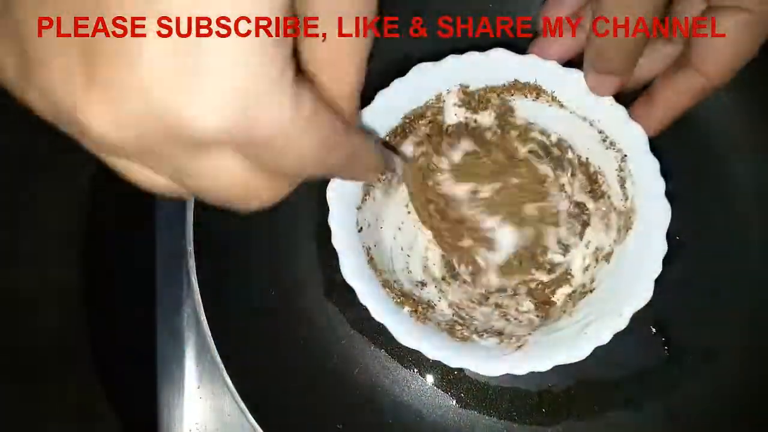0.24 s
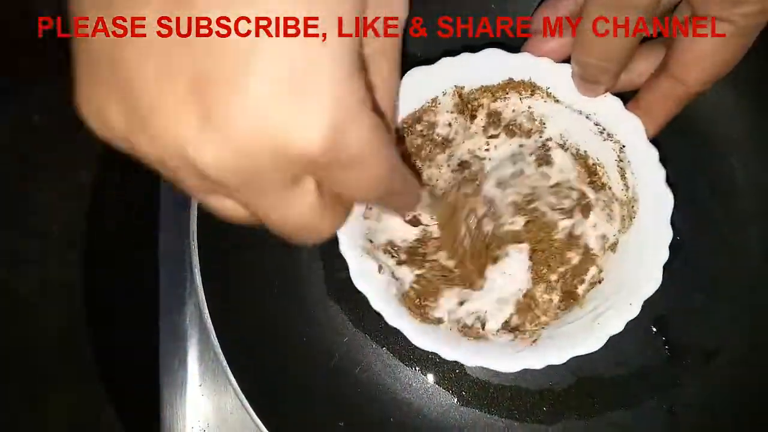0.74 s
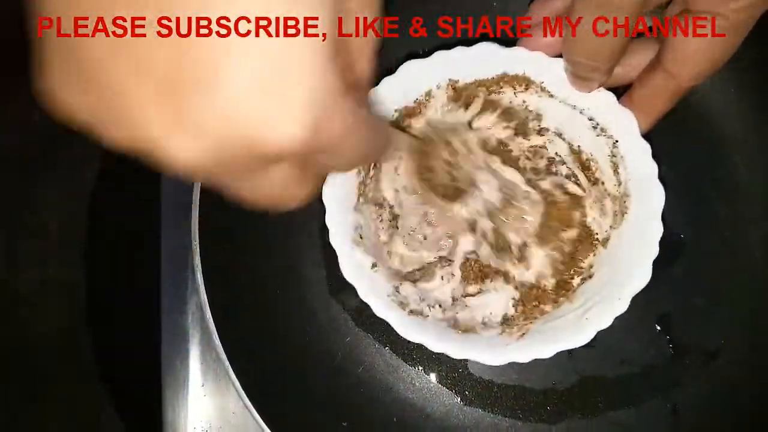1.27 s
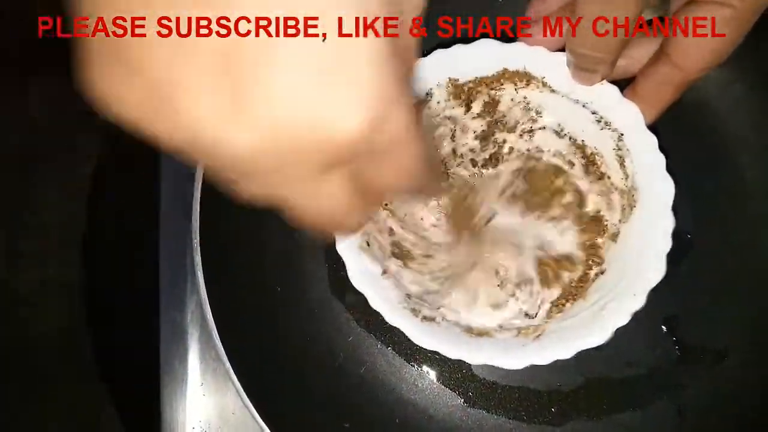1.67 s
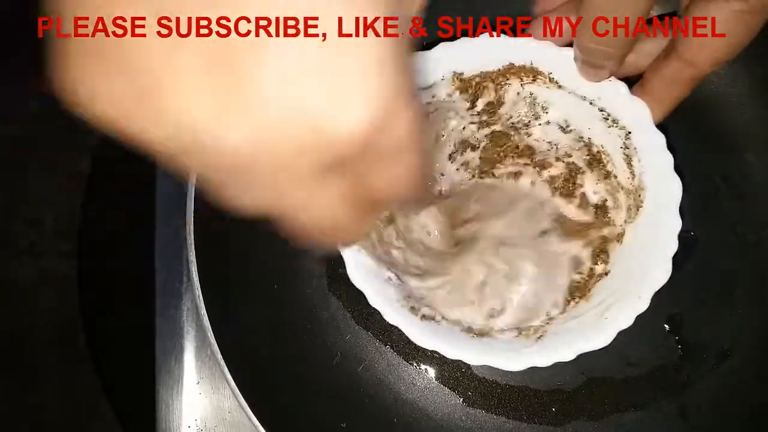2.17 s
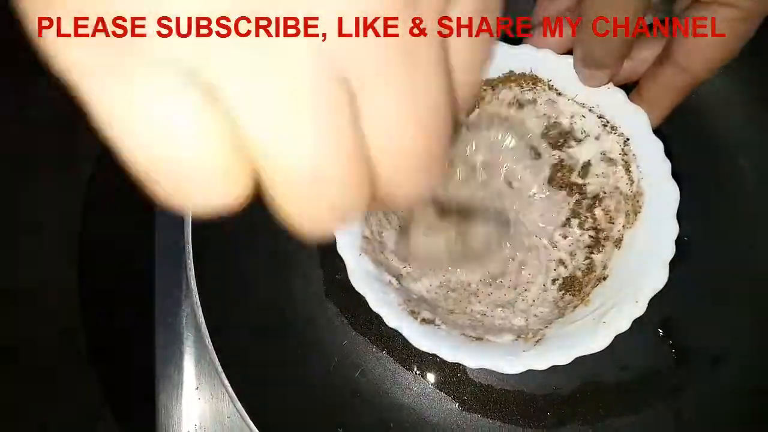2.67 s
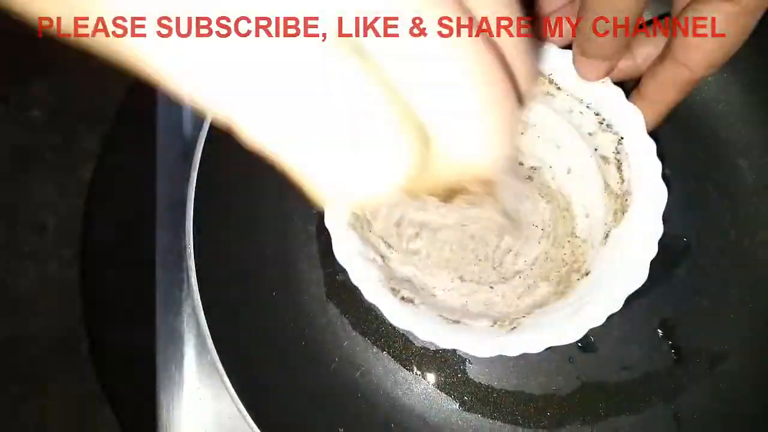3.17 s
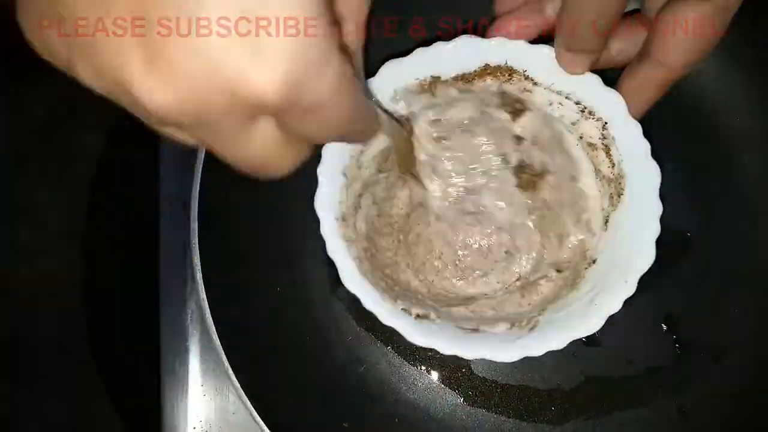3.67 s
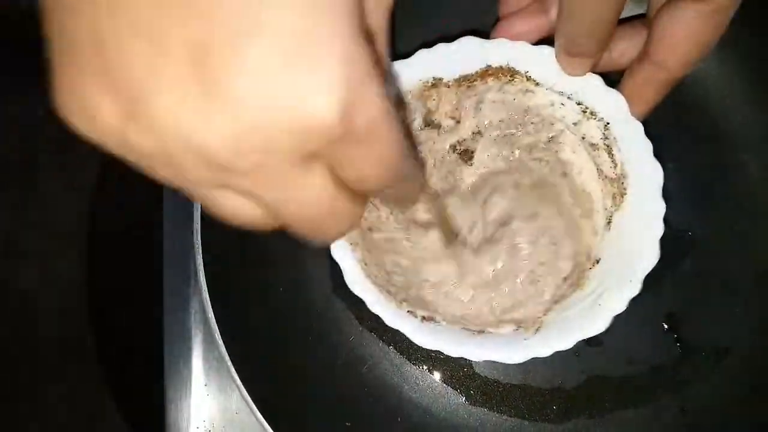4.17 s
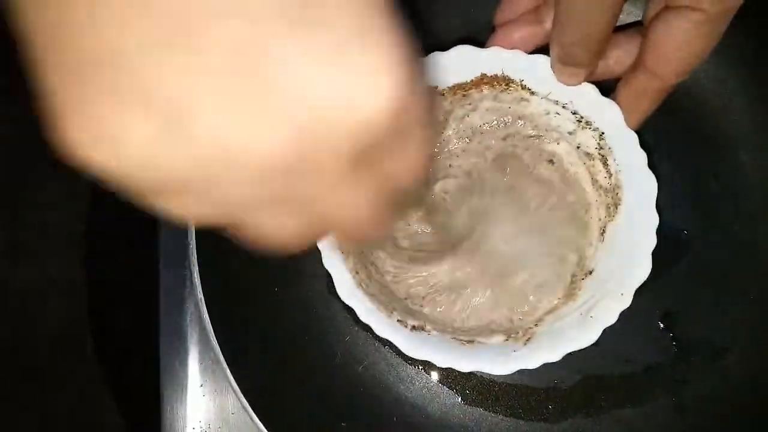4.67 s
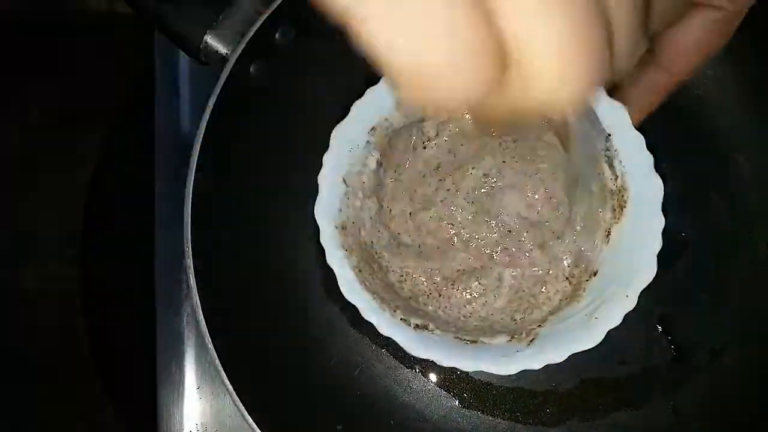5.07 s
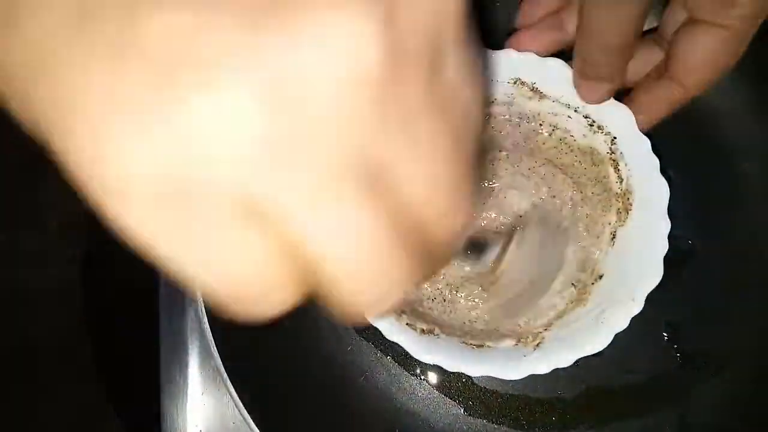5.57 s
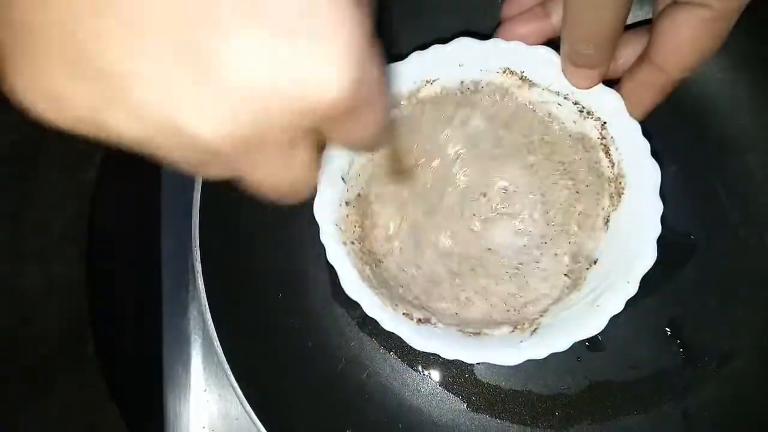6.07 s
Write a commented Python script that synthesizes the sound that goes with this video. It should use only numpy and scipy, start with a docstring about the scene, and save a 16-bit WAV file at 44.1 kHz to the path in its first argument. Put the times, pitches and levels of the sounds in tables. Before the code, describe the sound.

Very close, almost mono: a metal spoon beats thick gritty paste in a small glass bowl resting in a pan. Quick irregular clacks and scratchy, wet scraping run for over two seconds, thin out briefly, then return with two hard knocks past three and near four seconds. After another loud clack it quiets, then stirring resumes. A hard kitchen rings lightly; soft hiss and a faint far engine lie behind.

```python
"""Stirring spice paste into yogurt

A steel spoon beats the paste in a small glass bowl held down in a metal pan, close to the microphone.
Knocks ring the bowl's damped modes; random grains of grit and slip make the scrape, crackle and squelch.
The pan booms faintly through its own modes, and a hard kitchen rings after every knock.
An engine idles far outside, as wavering exhaust harmonics, behind soft hiss and thin whistles."""
import sys
import numpy as np
from scipy import signal
from scipy.fft import rfft, irfft, next_fast_len
from scipy.io import wavfile

SR = 44100
rng = np.random.default_rng(int(sys.argv[2]) if len(sys.argv) > 2 else 0)


def unload_audio(sound):
    """Save the sound as a 16-bit wav file, at the path given as the first command line argument."""
    columns = np.transpose(np.atleast_2d(sound))
    # keep every value between -1 and 1, then stretch to whole-number steps
    steps = np.round(np.clip(columns, -1, 1) * 32767)
    wavfile.write(sys.argv[1], SR, steps.astype(np.int16))


N = 279549

# Knocks of the spoon on the bowl. Each row: start in seconds, strength in dB, hardness in dB (high on bare
# glass, low through paste), bottom in dB (extra weight in the lowest modes), pitch of the clack in Hz.
KNOCKS = [(0.0005, -31.5, 2.5, 0.5, 3500), (0.467, -54.0, 11, -1, 3240), (0.6698, -38, 3, 3.5, 3800),
          (0.694, -45.5, 8, 7, 3720), (0.7229, -45.5, -4, -5, 4010), (0.7732, -38.5, -8, -20, 4120),
          (0.792, -28.5, 1.5, -2.5, 3340), (0.861, -44, -1, 6.5, 3500), (0.9476, -57.5, 4.5, 15.5, 4900),
          (1.004, -45.5, -4, -6, 3260), (1.0697, -48, -5, -5, 4020), (1.089, -32.5, 1.0, 1, 3900),
          (1.1519, -42, 4.5, 8.5, 4500), (1.3125, -39, 0.5, 5.5, 3760), (1.3877, -37, 0.5, 11.5, 4660),
          (1.442, -55.5, -33, 16, 4220), (1.476, -49, -6.5, -7, 3540), (1.5707, -49, 1, 3, 3750),
          (1.6364, -29, -0.5, 1.5, 3710), (1.6811, -30, -1.5, 4.5, 3800), (1.812, -31, 1, 3.0, 3280),
          (1.919, -39, -2.5, 6, 3740), (1.944, -41, -4.5, 2, 2750), (2.069, -36.5, 1, 4, 3660),
          (2.1368, -35, -1.5, 4, 3600), (2.2358, -39, -3, 2.5, 3908), (2.4626, -38, -5, 6, 4130),
          (2.4962, -40, -6, 4.5, 3370), (2.592, -41, -6, -24, 4000), (2.631, -46, -9, -3, 4070),
          (2.877, -58, -3.5, -15, 4000), (3.225, -53.5, -2.5, 5, 3820), (3.321, -20.5, -1, -5.5, 3900),
          (3.3261, -40.5, 4, 13.5, 2800), (3.523, -41.5, 7.5, -7.5, 3740), (3.571, -46.5, 8, 1, 3800),
          (3.627, -41.5, 1.5, -3, 4030), (3.864, -67.5, 5.5, -23, 4016), (3.9594, -22, 2.5, -3.5, 4356),
          (4.1566, -52.5, 0, 13, 4660), (4.2369, -35.5, -0.5, -23.5, 4380),
          (4.322, -61.5, -8.5, 19.5, 4100), (4.3431, -49, 8, -1, 3930), (4.397, -47.5, -2.5, -2.5, 4900),
          (4.5066, -49, -2.5, -4.5, 2960), (4.548, -38.5, 0, -10, 4050), (4.5877, -39, 0.5, 3.5, 4460),
          (4.7075, -24.0, 2.5, -4, 4330), (5.5909, -48, 4, 0.5, 3400), (5.6938, -49, 2, 7, 2876),
          (5.7869, -52.5, 9, 1, 5540), (5.8205, -31.5, 3.5, -10, 3700), (5.951, -38, -6, -9, 2700),
          (6.0699, -38, -3.5, 6, 3980), (6.1566, -35.5, -1, 1, 4080), (6.211, -52.5, -2.0, 14.5, 3600),
          (6.3205, -30.5, 1.5, 0.5, 3930)]
# Edges in Hz of the four registers of the bowl's modes: body, wall, clack and tick.
REGISTER_EDGES = [750, 1350, 2350, 6000, 14500]
CLACK_LOW_HZ = REGISTER_EDGES[2]
# How each register answers a knock. Each row: level in dB, dB gained per dB of hardness, dB gained per
# dB of bottom.
REGISTER_RESPONSE = [(-3.5, 0.06, 1), (0.5, -0.17, 0), (3, 0.6356, 0), (-4.5, 1.44, 0.5)]
# Modes of the bowl with paste and spoon. Each row: frequency in Hz, level in dB, t60 in seconds.
BOWL_MODES = [(962, -0.5, 0.035), (1108.6, 1.5, 0.044), (1260, -3, 0.023), (1535.5, -1, 0.032),
              (1680, -3, 0.024), (1859, -0.5, 0.022), (2150, -12.5, 0.027), (2687, -3, 0.0072),
              (3250, -10, 0.0074), (3756, -5.5, 0.014), (4150, -3.5, 0.013), (4640, -5.5, 0.0027),
              (5200, -6.5, 0.011), (6220, -2.5, 0.0072), (7070, -1, .009), (8140, 3, 0.013),
              (9000, 0.5, 0.011), (11650, 6, 0.0037), (12360, 0.5, 0.008)]
# Short rubs along the wall. Each row: centre in seconds, level in dB, half length in seconds.
RUBS = [(0.872, -49.5, 0.017), (1.237, -52, .018), (2.208, -46.5, 0.013), (2.24, -39, 0.011),
        (2.958, -61, 0.009), (2.997, -53.5, 0.01), (3.134, -46, 0.011), (3.2715, -41, 0.0045),
        (4.452, -47.5, 0.012), (4.47, -36, 0.0065), (5.72, -46, 0.008), (6.278, -51.5, 0.01)]

# Spells of stirring, between which the spoon is lifted. Each row: start in seconds, end in seconds,
# effort in dB.
SPELLS = [(0, 0.186, -4), (0.606, 0.643, -5), (0.665, 2.38, -2.5), (2.38, 2.61, -1), (2.883, 3.25, -3),
          (3.278, 3.661, 1), (4.152, 4.641, 0.5), (5.625, 6.34, -4.5)]
BITE_S, LIFT_S = 0.032, 0.066   # time constants as the spoon digs in and comes free
IDLE_DB = -36   # effort between spells, when it barely touches
SWELLS_PER_S, SWELL_DB = 14, 4   # the drag varies as the spoon meets lumps
RUMBLE_DB, SQUELCH_DB, SCRAPE_DB = -59, -63, -59.5   # at an effort of 0 dB
RUMBLE_FOLLOWS, SQUELCH_FOLLOWS, SCRAPE_FOLLOWS = 0.47, 0.66, 1   # dB per dB of effort

# Spectrum of the scraping grit. Each row: frequency in Hz, level in dB per Hz.
CRACKLE_SPECTRUM = [(2400, -3.5), (4000, 5.5), (5500, 2), (8300, -8.5), (10200, -11), (12400, -4.5),
                    (16000, 0.5)]
# The paste closes behind the spoon. Each row: centre in seconds, level in dB, half length in seconds.
SLURPS = [(2.64, -63, 0.061), (4.61, -56.5, 0.043)]
# Air pockets snap in the paste. Each row: start in seconds, level in dB.
SNAPS = [(0.231, -48), (1.556, -34), (2.043, -33), (2.437, -28), (3.031, -37), (3.702, -39.5),
         (3.865, -42.5)]

# The free spoon handle rings once. Each row: frequency in Hz, level in dB, t60 in seconds.
HANDLE_MODES = [(3065, -41.5, 0.11)]
CLINK_S = 0.467
# The tip of the spoon grazes the glass. Each row: start in seconds, level in dB.
GRAZES = [(2.952, -42.5), (3.444, -43), (5.147, -52.5), (5.246, -50.5), (5.788, -41.5)]
# Modes of the steel tip. Each row: frequency in Hz, level in dB, t60 in seconds.
TIP_MODES = [(8200, 1, 0.021), (12200, -5.5, .025)]

# Modes of the pan under the bowl. Each row: frequency in Hz, level in dB, t60 in seconds.
PAN_MODES = [(55, -7.5, 0.023), (122, -3.5, 0.029), (281.6, -3.5, 0.18), (331, -6, 0.42), (347, 5, 0.044),
             (431, -11.5, 0.39), (481, -5, 0.12), (700, -5.5, 0.036)]
# The bowl rocks on the pan. Each row: start in seconds, level in dB.
ROCKS = [(.467, -44), (1.682, -43.5), (4.55, -56.5), (5.591, -58.5)]
# The bowl is dragged a little on the pan. Each row: centre in seconds, level in dB, half length in seconds.
DRAGS = [(.03, -48.5, .04), (.52, -52, .04), (.74, -53, .025), (.88, -48.5, .025), (1.15, -50.5, .04),
         (1.73, -47.5, .06), (2.0, -52.5, .03), (2.26, -54, .035), (2.87, -58, .02), (3.1, -54.5, .03),
         (3.36, -52.5, .04), (4.56, -53, .04), (4.73, -54, .03), (5.63, -52, .025), (5.79, -54.5, .025),
         (6.32, -50, .045)]
# Spectrum of the dragging rumble. Each row: frequency in Hz, level in dB per Hz.
RUMBLE_SPECTRUM = [(60, -17.5), (150, -18.5), (240, -9.5), (295, 3), (340, -4), (400, -13), (650, -23),
                   (1100, -31.5)]

# Decay of the kitchen's echo. Each row: frequency in Hz, t60 in seconds.
ROOM_T60 = [(100, 0.45), (300, 0.3147), (1200, .50), (4000, 0.39), (9000, 0.29), (16000, 0.21)]
# Colour of the kitchen's echo. Each row: frequency in Hz, level in dB.
ROOM_COLOUR = [(100, -22), (300, 11.5), (700, 5), (1100, 0.5), (1700, 1.5), (2800, 1.5), (4200, -2.5),
               (8000, 1), (15000, 1)]

# The far engine. Each row: time in seconds, firings per second, level in dB.
ENGINE = [(0, 31.7, -60.5), (.45, 36.7, -58), (.9, 33.6, -60.5), (2.2, 32.1, -63.5), (2.65, 33.9, -60),
          (3.85, 35.8, -60.5), (4.15, 32.5, -59), (4.7, 31, -70), (5.3, 35.3, -70.5), (5.6, 27, -71),
          (6.34, 29.5, -58.5)]
# Exhaust harmonics. Each row: multiple of the firing rate, level in dB.
EXHAUST = [(3, -12), (4, -25.5), (5, -9), (6, -2), (7, -3.5), (10, -25)]
# Spectrum of the background hiss. Each row: frequency in Hz, level in dB per Hz.
AIR_SPECTRUM = [(25, -30), (105, -2.5), (160, -7.5), (310, -16.5), (450, -16.5), (1000, -25), (4000, -25.5),
                (6000, -25), (12000, -24.5), (16000, -43.5)]
AIR_DB = -66.5   # hiss while the outside noise is at its average level
# Thin whistles in the background. Each row: frequency in Hz, level in dB.
WHISTLES = [(3817, -81), (7050, -85.5), (11130, -86.5), (13320, -80)]

# Resonances in which the channels differ. Each row: frequency in Hz, width in Hz, lean as a gain
# (positive is left).
LEAN = [(1884, 218, 0.31), (9880, 690, -0.15)]
CUTOFF_HZ = 16200


def from_db(db):
    """Decibels to gain."""
    return np.exp(np.asarray(db) * np.log(10) / 20)


def rms_one(x):
    """Scale to an rms of 1."""
    return x / np.sqrt(np.mean(x ** 2) + 1e-20)


def in_time(rows):
    """The columns of a curve at every sample."""
    s, *columns = np.transpose(rows)
    return [np.interp(np.arange(N) / SR, s, column) for column in columns]


def at_hz(points, hz):
    """Read a spectrum on a log-frequency axis."""
    f, value = np.transpose(points)
    return np.interp(np.log(np.maximum(hz, 1)), np.log(f), value)


def band(x, low, high):
    """Causal band-pass."""
    edges = [low, min(high, SR / 2 - 1000)]
    return signal.sosfilt(signal.butter(2, edges, "band", fs=SR, output="sos"), x + 1e-18)


def peak(x, hz, width_hz):
    """A resonance with a gain of 1 at its top."""
    return signal.lfilter(*signal.iirpeak(hz, hz / width_hz, fs=SR), x)


def coloured(x, spectrum):
    """Give a signal's spectrum a colour; rms 1."""
    size = next_fast_len(N)
    hz = np.arange(size // 2 + 1) * SR / size
    return rms_one(irfft(rfft(x, size) * from_db(at_hz(spectrum, hz)), size)[:N])


def drift(points_per_s):
    """Slow chance with an rms of 1, in straight lines between random points."""
    points = rng.standard_normal(4000)
    return rms_one(np.interp(np.arange(N) / SR * points_per_s, np.arange(len(points)), points))


def ring(clicks, modes):
    """Each click sets every mode ringing at its own height; the modes alternate in sign."""
    out = 0
    for k, (hz, db, t60) in enumerate(modes):
        radius = from_db(-60 / (t60 * SR))
        w = 2 * np.pi * hz / SR
        poles = [1, -2 * radius * np.cos(w), radius * radius]
        out = out + (-1) ** k * from_db(db) * signal.lfilter([0, np.sin(w)], poles, clicks + 1e-18)
    return out


def add(track, s, sound):
    """Mix a sound into a track at a time."""
    at = int(np.clip(round(s * SR), 0, N - 1))
    track[at:at + len(sound)] += sound[:N - at]


def taps(rows):
    """One click for each row of start and level."""
    out = np.zeros(N)
    for s, db in rows:
        add(out, s, from_db([db]))
    return out


def grains(typical_per_s, spread_db):
    """Random clicks of either sign, clumped by a drifting rate; a few are far larger than the rest."""
    chance = typical_per_s * from_db(5 * drift(40)) / SR
    born = np.flatnonzero(rng.random(N) < chance)
    size_db = spread_db * np.minimum(rng.exponential(1, N)[born], 4)
    out = np.zeros(N)
    out[born] = from_db(size_db) * np.sign(rng.random(N)[born] - .5)
    return out


def swells(rows):
    """Strength of brief slides; each rises and fades in a bell shape."""
    t = np.arange(N) / SR
    power = 0
    for s, db, half_s in rows:
        power = power + from_db(db) ** 2 * np.exp(-np.minimum(((t - s) / half_s) ** 2, 100))
    return np.sqrt(power)


def knocks(mode_spread_db=4.5, crack=1.96, crack_s=0.0031, rise_s=0.00017, clack_gain=1.0,
           clack_width_hz=800, strike=1.3, strike_s=0.00038):
    """Each touch lands elsewhere and in other paste, so the modes shift in strength and pitch."""
    t, out = np.arange(int(.04 * SR)) / SR, np.zeros(N)
    attack, detune = int(.01 * SR), .02   # samples; spread of pitch as a fraction
    hz, mode_db, t60 = np.transpose(BOWL_MODES)
    register = np.digitize(hz, REGISTER_EDGES[1:-1])
    decay = from_db(-60 * t / t60[:, None])
    rise = 1 - np.exp(-(t / rise_s) ** 2)
    # the steel strikes sharply, then spice grains are crushed in the contact
    fade = np.exp(-t / crack_s) + strike * np.exp(-t / strike_s)
    grit = crack * rng.standard_normal((len(KNOCKS), len(t))) * fade
    cracks = [band(grit, low, high) for low, high in zip(REGISTER_EDGES, REGISTER_EDGES[1:])]
    for i, (s, db, hardness, bottom, clack_hz) in enumerate(KNOCKS):
        strength, shift, turn = rng.standard_normal((3, len(hz), 1))
        phase = 2 * np.pi * hz[:, None] * (1 + detune * shift) * t + np.pi * turn
        modes = from_db(mode_db[:, None] + mode_spread_db * strength) * decay * np.sin(phase)
        for k, (register_db, by_hardness, by_bottom) in enumerate(REGISTER_RESPONSE):
            part = (modes[register == k].sum(0) + cracks[k][i]) * rise
            if k == 2:   # the spot that is struck favours one pitch of the clack
                part = part + clack_gain * peak(part, clack_hz, clack_width_hz)
            level_db = db + register_db + by_hardness * hardness + by_bottom * bottom
            add(out, s - rise_s, from_db(level_db) * part / np.std(part[:attack]))
    # the knocks themselves carry little below about 560 Hz; the pan supplies the lows
    return signal.sosfilt(signal.butter(2, 560, "high", fs=SR, output="sos"), out + 1e-18)


def rubs(treble_db=-1.5):
    """Where steel meets bare glass it chatters in quick, nearly equal slips that ring all the modes."""
    slips = grains(typical_per_s=4000, spread_db=0.5)
    low_modes = [mode for mode in BOWL_MODES if mode[0] < CLACK_LOW_HZ]
    high_modes = [mode for mode in BOWL_MODES if mode[0] > CLACK_LOW_HZ]
    low = rms_one(band(ring(slips, low_modes), 1400, 1750))
    high = coloured(ring(slips, high_modes), CRACKLE_SPECTRUM)
    return swells(RUBS) * (low + from_db(treble_db) * high)


def effort():
    """How hard the spoon drags, in dB: each spell rises, holds and dies away, and lumps make it swell."""
    t = np.arange(N) / SR
    spells = []
    for start, end, db in SPELLS:
        bite = 1 - np.exp(-np.maximum(t - start + BITE_S, 0) / BITE_S)
        lift = np.exp(-np.maximum(t - end, 0) / LIFT_S)
        spells.append(from_db(db) * bite * lift)
    drag = np.maximum(np.max(spells, axis=0), from_db(IDLE_DB))
    return 20 * np.log10(drag) + SWELL_DB * drift(SWELLS_PER_S)


def wandering_modes(clicks, modes, wander_db):
    """Ring the modes while each drifts in strength as the spoon travels."""
    return sum(ring(clicks * from_db(wander_db * drift(18)), [mode]) for mode in modes)


def scrape(strength, wander_db=5.0, paste_db=-3.0, paste_low_hz=2500, paste_high_hz=13000):
    """Spice grit ticks in the high modes, whose mix wanders; the wet paste crackles without a pitch."""
    grit = grains(typical_per_s=280, spread_db=5.5)
    high_modes = [mode for mode in BOWL_MODES if mode[0] > CLACK_LOW_HZ]
    ticking = coloured(wandering_modes(grit, high_modes, wander_db), CRACKLE_SPECTRUM)
    bubbles = grains(typical_per_s=1100, spread_db=5.0)
    paste = rms_one(band(bubbles, paste_low_hz, paste_high_hz))
    return strength * (ticking + from_db(paste_db) * paste)


def squelch(strength, flutter_db=0.5):
    """The spoon sticks and slips in the paste, stirring now one low mode of the bowl, now another."""
    slips = grains(typical_per_s=300, spread_db=4.5)
    low_modes = [mode for mode in BOWL_MODES if mode[0] < CLACK_LOW_HZ]
    body = wandering_modes(slips, low_modes, flutter_db)
    return strength * rms_one(band(body, 1200, 1800))


def slurps(cavity_hz=690, width_hz=190):
    """Air is drawn through the furrow behind the spoon and rings in it, hollow."""
    air = rng.standard_normal(N)
    hollow = peak(peak(air, cavity_hz, width_hz), cavity_hz, width_hz)
    return swells(SLURPS) * rms_one(hollow)


def snaps(decay_s=0.0015, low_hz=6000, high_hz=14000):
    """A larger air pocket opens with a short, bright spit of noise."""
    t, out = np.arange(int(.02 * SR)) / SR, np.zeros(N)
    for s, db in SNAPS:
        add(out, s, from_db(db) * rng.standard_normal(len(t)) * np.exp(-t / decay_s))
    return band(out, low_hz, high_hz)


def spoon_ring():
    """The steel itself rings: the free handle once, and the tip wherever it grazes the glass."""
    return ring(taps([(CLINK_S, 0)]), HANDLE_MODES) + ring(taps(GRAZES), TIP_MODES)


def pan(rumble, carry_db=-16.5):
    """Knocks, rocking and the dragging of the bowl pass down into the pan."""
    blows = taps([(s, db + carry_db) for s, db, *_ in KNOCKS]) + taps(ROCKS)
    dragging = np.hypot(rumble, swells(DRAGS)) * coloured(rng.standard_normal(N), RUMBLE_SPECTRUM)
    return ring(blows, PAN_MODES) + dragging


def kitchen(x, wet_db=-11.5, build_s=0.0064):
    """Dense reflections build up within milliseconds and die band by band."""
    t = np.arange(2 ** 15) / SR
    hz = np.arange(len(t) // 2 + 1) * SR / len(t)
    reflections = rfft(rng.standard_normal(len(t))) * from_db(at_hz(ROOM_COLOUR, hz))
    centres, echo = np.geomspace(100, 16000, 8), 0
    for k, centre in enumerate(centres):
        only_this_band = np.arange(len(centres)) == k
        share = at_hz(list(zip(centres, only_this_band)), hz)   # neighbouring bands cross-fade
        echo = echo + irfft(reflections * share) * from_db(-60 * t / at_hz(ROOM_T60, centre))
    echo = echo * (1 - np.exp(-(t / build_s) ** 2))
    return from_db(wet_db) * signal.fftconvolve(x, echo / np.linalg.norm(echo))[:N]


def engine(waver_db=3.0):
    """Only the low exhaust harmonics of the far engine come through the wall, each wavering in level."""
    rate, db = in_time(ENGINE)
    turn = 2 * np.pi * np.cumsum(rate) / SR
    lines = 0
    for multiple, level in EXHAUST:
        wave = np.sin(multiple * turn + 2 * np.pi * rng.random())
        lines = lines + from_db(level + waver_db * drift(6.0)) * wave
    return np.sqrt(2) * from_db(db) * lines


def background(width_hz=22, hiss_follows=0.24):
    """Soft hiss that swells and sinks with the noise outside, and a few narrow whistles."""
    white, outside_db = rng.standard_normal(N), in_time(ENGINE)[1]
    whistles = 0
    for hz, db in WHISTLES:
        tone = peak(peak(white, hz, width_hz), hz, width_hz)
        whistles = whistles + from_db(db) * rms_one(tone)
    hiss_db = AIR_DB + hiss_follows * (outside_db - outside_db.mean())
    return whistles + from_db(hiss_db) * coloured(rng.standard_normal(N), AIR_SPECTRUM)


def scene():
    """Bowl and pan close to the microphone, almost mono; one effort drives squelch, scrape and rumble."""
    effort_db = effort()
    squelching = squelch(from_db(SQUELCH_DB + SQUELCH_FOLLOWS * effort_db))
    scraping = scrape(from_db(SCRAPE_DB + SCRAPE_FOLLOWS * effort_db))
    booming = pan(from_db(RUMBLE_DB + RUMBLE_FOLLOWS * effort_db))
    rest = squelching + scraping + rubs() + spoon_ring() + snaps() + booming
    near = knocks() + rest
    # the far side of the bowl radiates a purer mix of its modes, which arrives only by way of the walls
    far = knocks(crack=0.5) + rest
    echo = (kitchen(near) + kitchen(far)) / np.sqrt(2)
    mid = near + echo + engine() + background() + slurps()
    side = sum(lean * peak(mid, hz, width) for hz, width, lean in LEAN)
    return np.array([mid + side, mid - side])


def record(dry, top=0.85):
    """The highest peaks are rounded, then the treble is cut steeply."""
    rounded = top * np.tanh(dry / top)
    return signal.sosfilt(signal.ellip(10, .1, 80, CUTOFF_HZ, fs=SR, output="sos"), rounded)


dry = scene()
out = record(dry)
unload_audio(out)
```